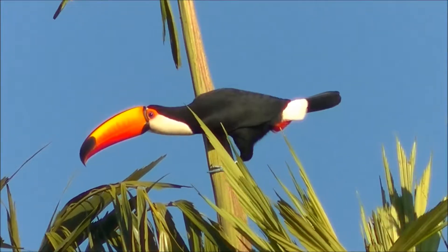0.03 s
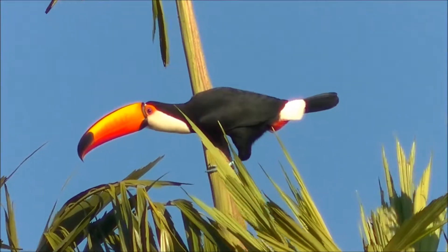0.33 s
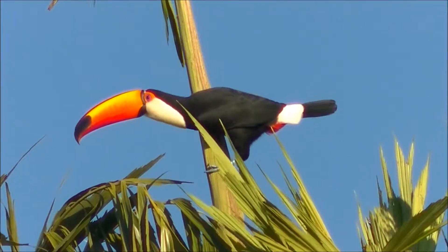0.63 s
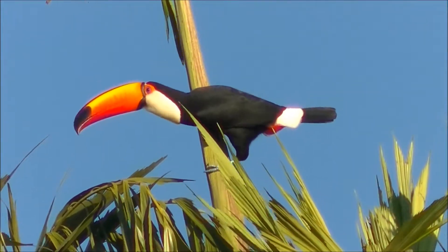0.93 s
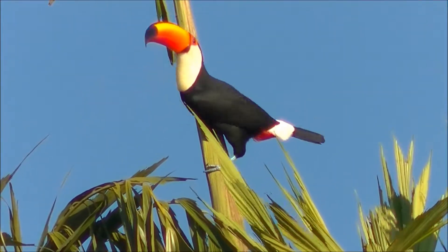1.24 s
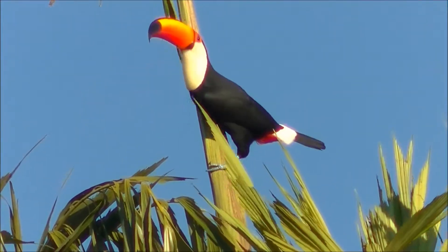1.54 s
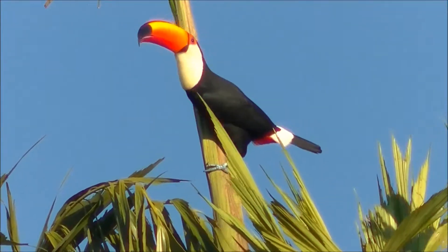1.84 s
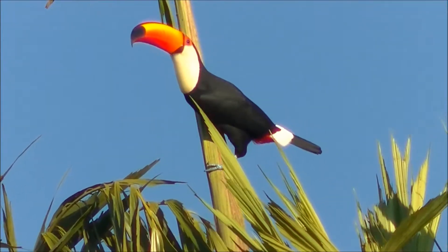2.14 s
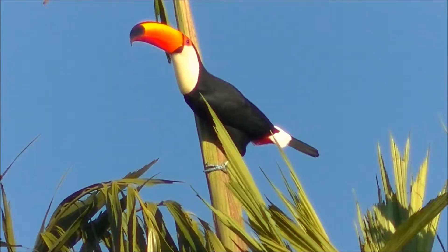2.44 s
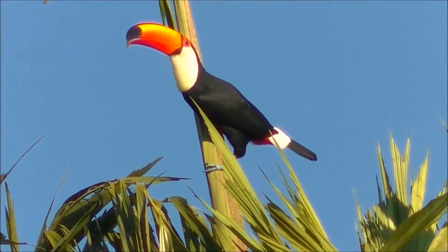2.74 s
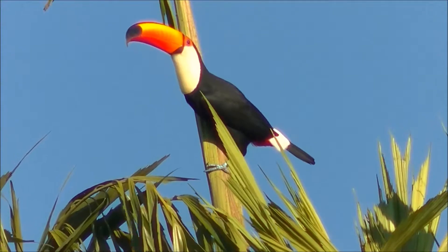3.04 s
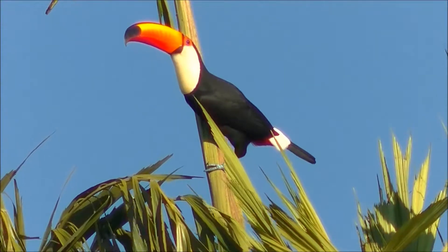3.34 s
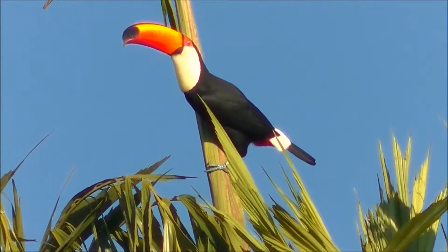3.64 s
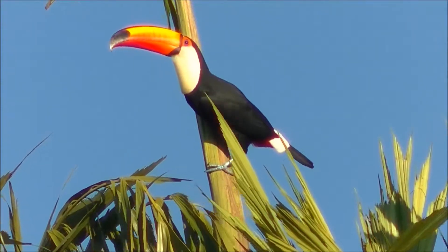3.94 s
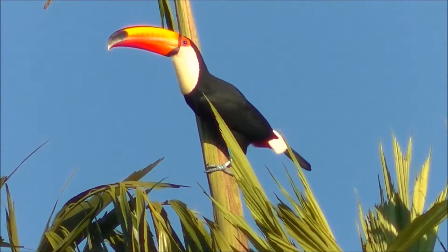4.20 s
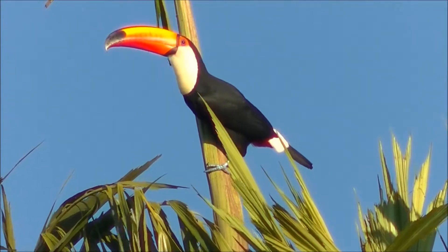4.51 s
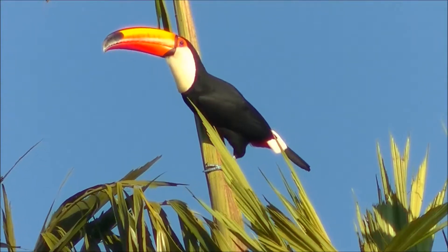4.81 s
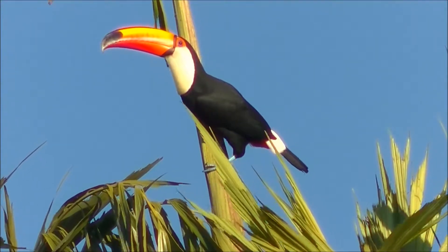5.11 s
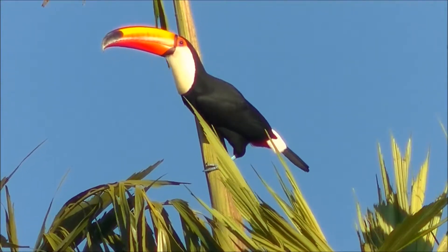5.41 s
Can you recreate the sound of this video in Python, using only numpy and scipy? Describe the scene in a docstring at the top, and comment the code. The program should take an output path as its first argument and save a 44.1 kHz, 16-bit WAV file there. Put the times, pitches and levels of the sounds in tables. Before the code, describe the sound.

Outdoors among trees, a toucan in front of the microphone repeats a brief, rattling croak at a slightly uneven pace, starting at once. Behind it a smaller bird adds two runs of shrill, sizzling rasps, the first long, the second short and squeaky. Crickets trill softly now and then, and a faint wooden rattle, a few far hoots and a fading distant engine barely rise out of the quiet, airy background.

```python
"""A toucan croaks from a palm: each croak is a slowing rattle of short hollow pops, as puffs of air
swing the membrane of its syrinx and ring the resonances of its throat and bill. A smaller bird
further off scolds in runs of hissy rasps, and foliage and trees scatter both voices. Crickets trill
by stridulation; something rattles, chirps and hoots far away. Beneath it all lie the low rumble of
open country, a chorus of insects and the fading drone of a distant engine."""
import sys
import numpy as np
from scipy import signal
from scipy.fft import rfft, irfft
from scipy.io import wavfile

SR = 44100
rng = np.random.default_rng(int(sys.argv[2]) if len(sys.argv) > 2 else 0)


def wav_out(sig):
    """Save sig, one row per channel (or a flat mono array), as 16-bit PCM at SR to the path in sys.argv[1]."""
    wavfile.write(sys.argv[1], SR, np.round(np.clip(np.atleast_2d(sig).T, -1, 1) * 32767).astype(np.int16))


N = 245195
TIME = np.arange(N) / SR
FREQ = np.maximum(np.arange(N // 2 + 1) * SR / N, 1)
LEAD_IN = SR // 5  # samples; the first croak is already under way at t = 0


def undb(db):
    """Amplitude ratio of a level in decibels."""
    return 10 ** (np.asarray(db) / 20)


def unit(x):
    """Normalisation to rms 1."""
    return x / np.sqrt(np.mean(x ** 2))


def colour(points):
    """Gain spectrum from (f/Hz, level/dB) points, interpolated in log frequency."""
    hz, db = np.transpose(points)
    return undb(np.interp(np.log(FREQ), np.log(hz), db))


def resonance(hz, width_hz):
    """Response of a damped resonator, with gain 1 at its centre."""
    return 1 / (1 + 1j * (FREQ ** 2 - hz ** 2) / (FREQ * width_hz))


def filtered(x, response):
    """Linear filtering: the spectrum is multiplied by a frequency response."""
    return irfft(rfft(x) * response, N)


def noise(response):
    """Spectrally shaped Gaussian noise of rms 1."""
    return unit(filtered(rng.standard_normal(N), response))


def walk(rate_hz):
    """Random modulation: noise of rms 1, low-passed at rate_hz."""
    return noise(1 / (1 + (FREQ / rate_hz) ** 4))


def sine(hz):
    """Oscillation whose phase is the integral of its instantaneous frequency."""
    return np.sin(2 * np.pi * np.cumsum(hz) / SR)


def swell(t, rise_s, fall_s):
    """Asymmetric Gaussian envelope that peaks at t = 0."""
    return np.exp(-(t / np.where(t < 0, rise_s, fall_s)) ** 2)


def scatter(x, t60, delay_s, db):
    """Diffuse reflection: many weak echoes arrive after a delay and decay exponentially."""
    t = TIME[:SR]
    tail = rng.standard_normal(SR) * undb(-60 * t / t60) * (t > delay_s)
    return undb(db) * signal.fftconvolve(x, tail / np.linalg.norm(tail))[:N]


def pops(start, end, count, db, hz, rise_hz, overtone_db, catch_db, last_db, gap_growth=1.075):
    """Pulse train with geometrically growing gaps: each pop's time, level, pitch and overtone level."""
    steps = gap_growth ** np.arange(round(count)) - 1
    progress = steps / steps[-1]
    age, last = progress * (end - start), progress == 1
    # the voice builds from a weak first pop, tires a little and catches once early on
    level = db - 19.5 * np.exp(-age / .016) - 2.5 * progress ** 2
    level += catch_db * swell(age - .046, .017, .017) + last_db * last
    pitch = hz + rise_hz * progress - 60 * last
    # it hardens until three quarters of the way through, then softens
    hardness = overtone_db - 8 * (1 - swell(progress - .75, .43, .18))
    return start + age, level, pitch, hardness


# Overtones of a pop: harmonic number, relative level/dB
POP_HARMONICS = [(2, -5.5), (3, -14), (4, -18)]


def syrinx(croak, rise_s=.0015, fall_s=.0024, blip_hz=2600):
    """Flow-driven membrane vibration: the tone of one croak and the envelope of its escaping air."""
    tone, airflow = np.zeros((2, N))
    for s, db, hz, hardness_db, jitter in zip(*pops(*croak), rng.standard_normal((13, 6))):
        near = slice(int((s - .01) * SR) + LEAD_IN, int((s + .01) * SR) + LEAD_IN)
        t = TIME[near] - LEAD_IN / SR - s
        # the membrane swings a few times; its pitch arches with the pressure of the puff
        puff = swell(t, rise_s, fall_s)
        pitch = hz * (1 + .012 * jitter[0]) * (1 + .06 * (2 * puff - 1.6))
        phase = 2 * np.pi * (np.cumsum(pitch) - pitch[t < 0].sum()) / SR
        size = undb(db + .5 * jitter[1])
        tone[near] += size * puff * np.sin(phase + .5 * jitter[2])
        # overtones sound only while the swing is widest
        hard, ahead = size * undb(hardness_db), t + .00043
        overtones = sum(undb(level) * np.sin(round(k) * phase + 2 * shift)
                        for (k, level), shift in zip(POP_HARMONICS, jitter[3:]))
        tone[near] += hard * swell(ahead, .0015, .0015) * overtones
        # a forceful pop opens with a higher blip, just before the low swing takes hold
        blip = swell(t + .0029, .0012, .0034) * np.sin(2 * np.pi * blip_hz * t)
        tone[near] += hard * undb(-7.5) * blip
        airflow[near] += size * undb(.85 * hardness_db) * swell(ahead, .0023, .0023)
    return tone, airflow


# Croaks: first pop t/s, last pop t/s, number of pops, source level/dB, f/Hz, rise in f/Hz,
# then relative to the source: overtone level/dB, catch level/dB, last pop level/dB
TOUCAN_CROAKS = [(-.1328, .042, 10, -22.5, 1420, 50, 0.5, 2, -5.5),
                 (1.0576, 1.227, 10, -21, 1395, 250, -0.5, -1.5, 0.5),
                 (1.8759, 2.051, 10, -20.5, 1350, 130, -3, -2.5, -7),
                 (2.7653, 2.933, 10, -20.5, 1373, 100, -2.5, -9, -0.5),
                 (3.7983, 3.9677, 10, -22, 1382, 140, -0.5, 1, -1),
                 (4.758, 4.95, 11, -21, 1405, 98, -1, -2.5, -11.5)]
# Throat and bill resonances rung by the air of each pop: f/Hz, bandwidth/Hz, level/dB
THROAT_FORMANTS = [(513, 108, -4.5), (1006, 500, -10.5), (1986, 216, 4.5), (2450, 400, 2), (3180, 450, 8.5),
                   (3943, 595, 2.5), (4760, 1400, -14), (5900, 600, -10)]
# Transmission of the syrinx tone through the bill: f/Hz, level/dB
BILL_RESPONSE = [(1500, 0), (2400, 3), (2700, -8), (3150, -1), (3550, 11), (4100, 4), (4600, 3), (5500, 1),
                 (6100, -41), (7000, -41)]


def toucan(slack_ratio=.957, tighten_s=.077):
    """Source and filter: throat and bill shape the tone and hoarse air; fronds and trees reflect them."""
    throat = sum(undb(db) * resonance(hz, width) ** 2 for hz, width, db in THROAT_FORMANTS)
    throat /= 1 + (FREQ / 7500) ** 8
    bill = colour(BILL_RESPONSE)
    # the throat starts each croak slack, with lower resonances and a boom that dwindles as it tightens
    low_band = 1 / (1 + (FREQ / 700) ** 8)
    slack_bill = np.interp(FREQ / slack_ratio, FREQ, bill)
    slack_throat = np.interp(FREQ / slack_ratio, FREQ, throat) * undb(3 * low_band)
    tight_throat = throat * undb(-4 * low_band)
    out = np.zeros(N)
    for croak in TOUCAN_CROAKS:
        tone, airflow = syrinx(croak)
        tone, breath = undb(2) * tone, undb(7.5) * airflow * rng.standard_normal(N)
        age = TIME - LEAD_IN / SR - croak[0]
        tight = np.clip((age - .04) / tighten_s, 0, 1)
        voice = filtered((1 - tight) * tone, slack_bill) + filtered((1 - tight) * breath, slack_throat)
        voice += filtered(tight * tone, bill) + filtered(tight * breath, tight_throat)
        # the bird turns between croaks, so the fronds answer each one differently
        out += voice + scatter(voice, t60=.056, delay_s=.003, db=-8)
    # a distant line of trees sends back one dull, smeared echo
    echo = scatter(filtered(out, resonance(1450, 900)), t60=.064, delay_s=.165, db=-26)
    out += scatter(out, t60=.34, delay_s=.013, db=-13) + echo
    return np.append(out[LEAD_IN:], np.zeros(LEAD_IN))


# Spectral density of the open air: f/Hz, relative level/dB
AIR_SPECTRUM = [(15, -54), (25, -14), (64, -2.5), (160, -9.5), (349, -11), (457, -12.5), (537, -10.5),
                (631, -12), (871, -12.5), (1200, -11), (1900, -9.5), (2420, -12), (2920, -10.5),
                (3260, -11), (15500, -28)]
# Its stereo width: f/Hz, side minus mid level/dB
AIR_SIDE_RATIO = [(60, -13), (130, 0.5), (300, 2), (600, 0.5), (1200, -6.5), (2500, -16.5), (8000, -44.5)]


def open_air():
    """Partly coherent noise: an antiphase side signal widens the rumble; the thin hiss stays central."""
    mid_gain = colour(AIR_SPECTRUM)
    side_gain = mid_gain * colour(AIR_SIDE_RATIO)
    side = noise(side_gain) * np.linalg.norm(side_gain) / np.linalg.norm(mid_gain)
    return undb(-54 + .5 * walk(6.4)) * (noise(mid_gain) + side * np.array([[1], [-1]]))


def insect_chorus():
    """Incoherent summation: far insects merge into one wavering band of noise."""
    return undb(-64.5 + 2 * walk(5.8)) * noise(resonance(2884, 430) ** 2)


def engine(fade_db_per_s=2.5):
    """Attenuation with distance: two low bands of noise fade as an engine draws away."""
    drone = noise(resonance(71.8, 10.8) ** 2) + undb(-4.5) * noise(resonance(137, 36) ** 2)
    return undb(-62 - fade_db_per_s * TIME) * drone


# Cricket trills: start t/s, end t/s, f/Hz, level/dB
CRICKET_TRILLS = [(0.056, 0.49, 3830, -50.5), (0.748, 0.877, 3950, -51.5), (0.893, 1.07, 4080, -49.5),
                  (3.06, 3.185, 4040, -51), (3.769, 4.252, 3860, -50.5), (4.63, 4.99, 4040, -49.5)]


def crickets(stroke_hz=34, fade_s=.01):
    """Stridulation: uneven wing strokes ring one note; each trill fades in and out."""
    out = np.zeros(N)
    waver, force = 1 + .0063 * walk(150), undb(2 * walk(23))
    for start, end, hz, db in CRICKET_TRILLS:
        fade = np.clip(np.minimum(TIME - start, end - TIME) / fade_s, 0, 1) ** .5
        strokes = np.sin(np.pi * stroke_hz * (TIME - start)) ** 2 * fade
        out += undb(db) * force * strokes * sine(hz * waver)
    return out + scatter(out, t60=.45, delay_s=.01, db=-4)


def wooden_rattle(start_s=.334, end_s=.9, knock_hz=30, fade_db_per_s=12):
    """Pulsed resonance: one sharp, far knock and then dying weaker ones sound in two bands of noise."""
    times = np.arange(start_s, end_s, 1 / knock_hz)
    levels = -56.5 - fade_db_per_s * (times - start_s)
    levels[0] += 10
    knocks = sum(undb(db) * swell(TIME - s, .0041, .0069) for s, db in zip(times, levels))
    wood = noise(resonance(906, 210) ** 2) + undb(-3.5) * noise(resonance(2220, 500) ** 2)
    return knocks * wood


def far_chirps():
    """Narrow-band noise bursts are heard as pitched: a tiny high tick and, later, a lower chirp."""
    tick = undb(-57) * swell(TIME - .368, .004, .007) * noise(resonance(6700, 1100) ** 2)
    chirp = undb(-58) * swell(TIME - 3.25, .019, .072) * noise(resonance(2220, 186) ** 2)
    return tick + chirp


# Runs of rasps: start t/s, end t/s, first gap/s, growth per gap/s
RASP_RUNS = [(1.1372, 3.1, .05001, .0009025), (4.2458, 4.665, .04675, .001576)]


def rasp_times():
    """Pulse train with linearly growing gaps: each rasp's time and the time since its run began."""
    for first, last, gap, growth in RASP_RUNS:
        s = first
        while s < last + gap / 2:
            yield s, s - first
            s, gap = s + gap, gap + growth


# Effort of the scolding bird: t/s, source level/dB, base f/Hz, half length of a rasp/s
RASP_EFFORT = [(1.14, -33, 5000, .016), (1.29, -36.5, 4960, .018), (1.4, -35, 4900, .024),
               (1.62, -34, 4882, 0.016), (1.86, -34.5, 4870, .014), (2.3, -33.5, 5100, .016),
               (2.59, -36.5, 5036, 0.012), (2.66, -33, 4980, .012), (2.87, -34.5, 4697, .015),
               (3.04, -35.5, 4890, .018), (3.1, -50, 4900, .018), (4.25, -34.5, 5020, .016),
               (4.34, -37.5, 4970, .012), (4.39, -37, 4930, 0.027), (4.45, -40, 4910, 0.027),
               (4.61, -40, 4510, .016), (4.665, -48, 4450, 0.014)]
# Spectral density of the hiss in a rasp: f/Hz, relative level/dB
HISS_SPECTRUM = [(500, -24.5), (1000, -9), (1600, -6.5), (2200, -7.5), (3100, 3.5), (3500, -1.5),
                 (4200, 3.5), (5300, -3), (6000, -3), (6800, -17.5), (7400, -11), (9000, -45), (13000, -64)]
# Spectral density of the sizzle that outlasts it: f/Hz, relative level/dB
SIZZLE_SPECTRUM = [(4000, -45), (6500, 11.5), (7600, -1.5), (8500, -1), (9300, -7.5), (10300, -7),
                   (12000, -16.5), (15000, -22)]


def rasps(shrill_hz=420, fall_hz=954.5, squeak_rise_hz=450):
    """Roughness by random modulation: each rising squeak breaks into hiss around a falling whistle."""
    puff, pitch, squeaks, sizzle = np.zeros((4, N))
    effort_s, *effort = np.transpose(RASP_EFFORT)
    for s, age in rasp_times():
        near = slice(int((s - .03) * SR), int((s + .06) * SR))
        t = TIME[near] - s
        db, hz, half_s = (np.interp(s, effort_s, column) for column in effort)
        # a run bursts out shrill and hissy, with steeply falling notes, then settles
        fresh = np.exp(-age / .15)
        hz += shrill_hz * fresh
        puff[near] += undb(db) * swell(t, .9 * half_s, half_s)
        pitch[near] = hz - fall_hz * np.exp(-age / .55) * np.tanh(t / half_s)
        sizzle_db = db - 16 + 5 * np.exp(-age / .25)
        sizzle[near] += undb(sizzle_db) * swell(t, half_s, 1.53 * half_s)
        # the opening squeaks emerge as the run settles
        ahead, squeak_db = t + .00725, db + 3.5 - 36 * fresh
        glide = hz * (1 + .0181 * rng.standard_normal()) + squeak_rise_hz * np.tanh(ahead / .0031)
        squeaks[near] += undb(squeak_db) * swell(ahead, .00097, .0033) * sine(glide)
    # the whistle leaps by hundreds of hertz within milliseconds
    whistle = np.sqrt(2) * sine(pitch * (1 + .13 * walk(260)))
    body = puff * (undb(-5) * whistle + undb(-4.5) * noise(colour(HISS_SPECTRUM)))
    grain = unit(undb(1.3 * walk(260)))
    return squeaks + grain * (body + sizzle * noise(colour(SIZZLE_SPECTRUM)))


# Longer clear squeaks among the rasps: t/s, level/dB, f/Hz, glide/(Hz/s), half length/s
CLEAR_SQUEAKS = [(1.508, -38, 5200, 5000, .01), (4.399, -33, 4950, 44000, .012),
                 (4.494, -39, 4500, -40000, .007), (4.548, -45, 4400, -10000, .008),
                 (4.608, -42, 4250, -10000, .006)]


def scolding_bird():
    """Scattering by foliage: rasps and clear squeaks return with their lower part strongest."""
    voice = rasps()
    for s, db, hz, glide, half_s in CLEAR_SQUEAKS:
        t = TIME - s
        sweep = np.sqrt(2) * np.sin(2 * np.pi * (hz + glide * t / 2) * t)
        voice += undb(db) * swell(t, half_s, half_s) * sweep
    leaves = scatter(voice, t60=.08, delay_s=.002, db=-9)
    trees = scatter(filtered(voice, resonance(2600, 6900)), t60=.41, delay_s=.0093, db=-3)
    return voice + leaves + trees


# Far hoots: start t/s, end t/s, f/Hz, droop in f/Hz, level/dB
HOOT_NOTES = [(2.27, 2.52, 552.6, 30, -64.5), (3.13, 3.58, 537, 25.7, -65), (3.545, 4.365, 544, 55.3, -62)]


def far_hoots(fade_s=.082):
    """Slow frequency modulation: each wavering pure tone is held, then droops."""
    out = np.zeros(N)
    waver, force = 1 + .0039 * walk(29), undb(2 * walk(4.9))
    for start, end, hz, droop_hz, db in HOOT_NOTES:
        progress = np.clip((TIME - start) / (end - start), 0, 1)
        fade = np.clip(np.minimum(TIME - start, end - TIME) / fade_s, 0, 1)
        pitch = (hz - droop_hz * progress ** 4) * waver
        out += undb(db) * fade * unit(force * sine(pitch))
    return out


def scene():
    """Superposition: the animals and the engine are straight ahead; only the open air has width."""
    calls = toucan() + scolding_bird() + crickets() + far_hoots() + wooden_rattle() + far_chirps()
    return calls + open_air() + insect_chorus() + engine()


def record(dry, cutoff_hz=15800):
    """Band limiting: a steep elliptic low-pass removes the highest treble."""
    return signal.sosfilt(signal.ellip(10, .2, 70, cutoff_hz, fs=SR, output="sos"), dry)


dry = scene()
out = record(dry)
wav_out(out)
```